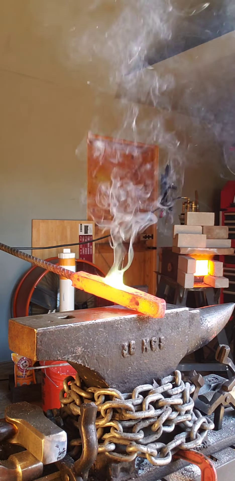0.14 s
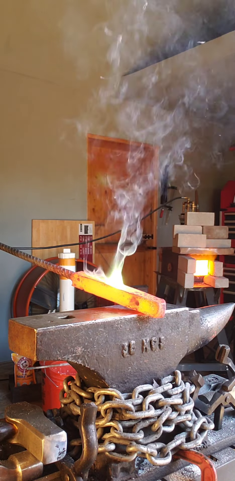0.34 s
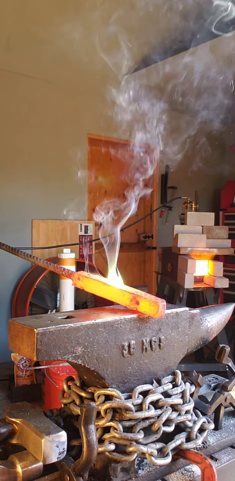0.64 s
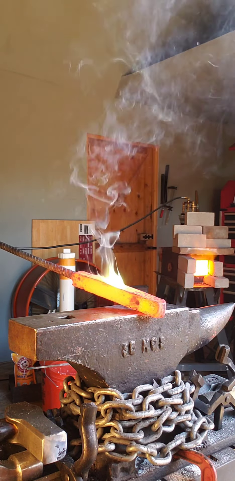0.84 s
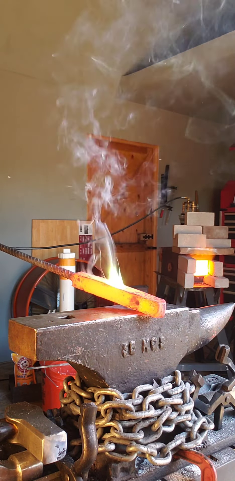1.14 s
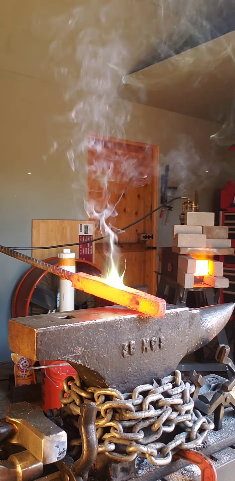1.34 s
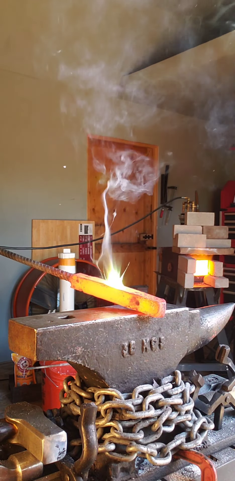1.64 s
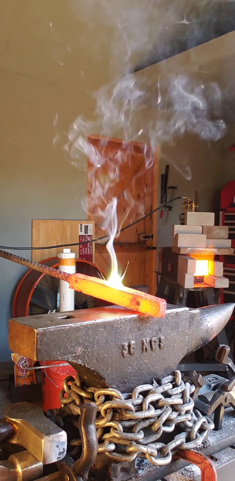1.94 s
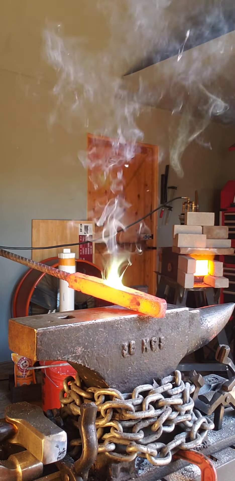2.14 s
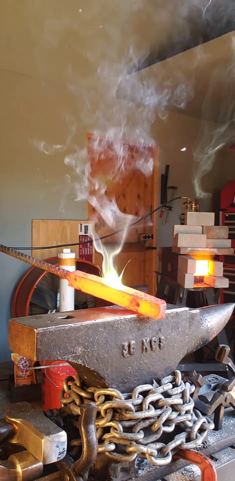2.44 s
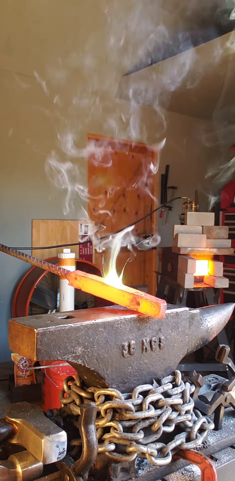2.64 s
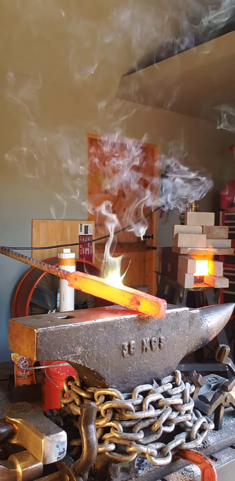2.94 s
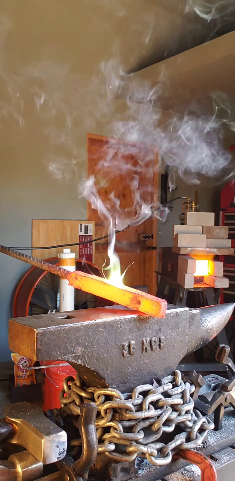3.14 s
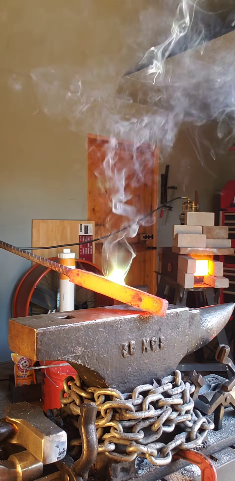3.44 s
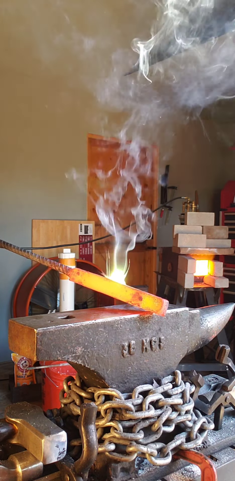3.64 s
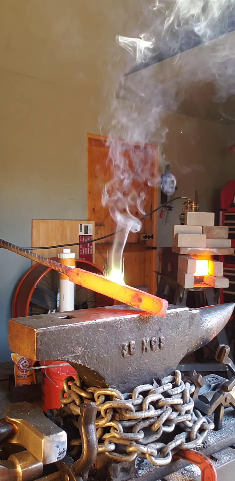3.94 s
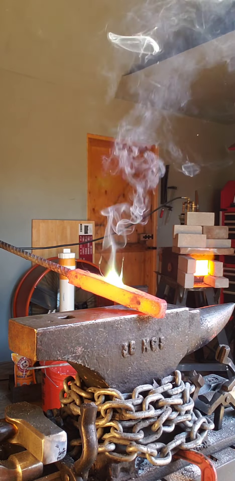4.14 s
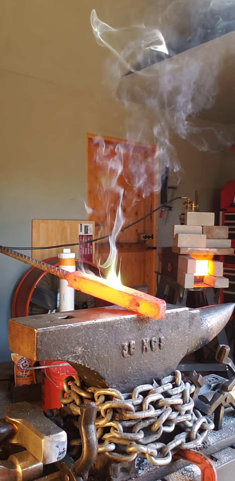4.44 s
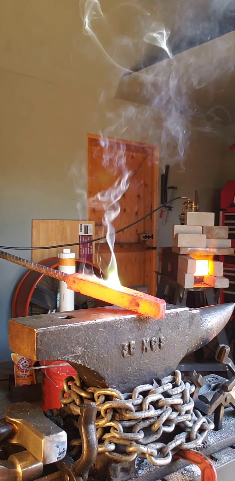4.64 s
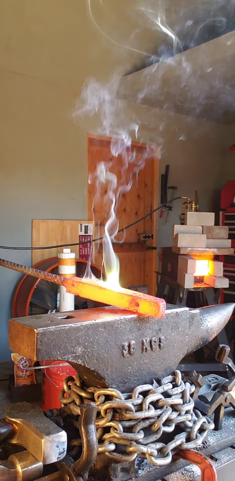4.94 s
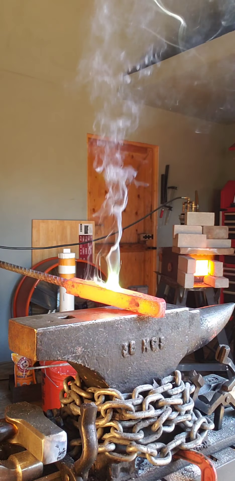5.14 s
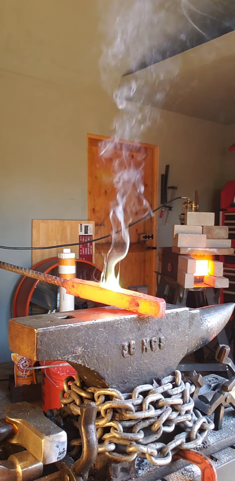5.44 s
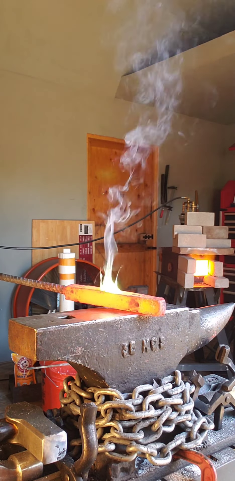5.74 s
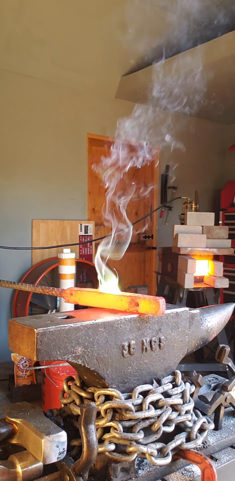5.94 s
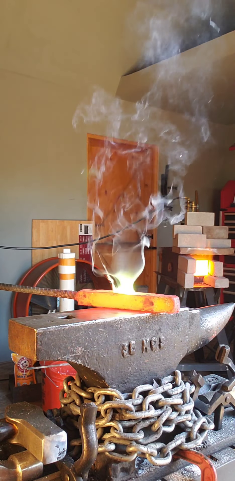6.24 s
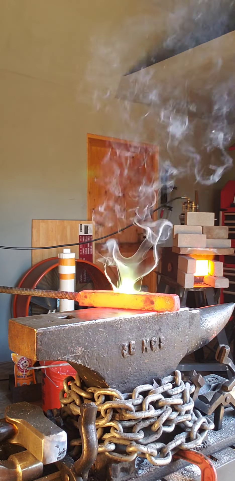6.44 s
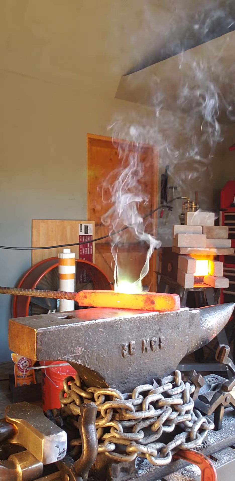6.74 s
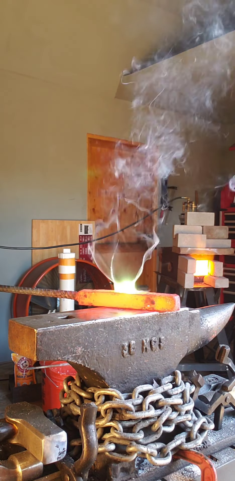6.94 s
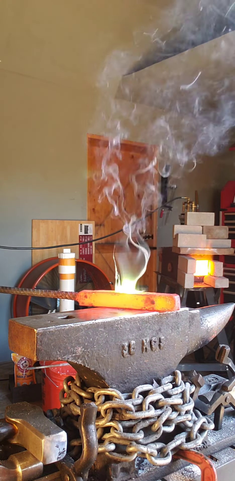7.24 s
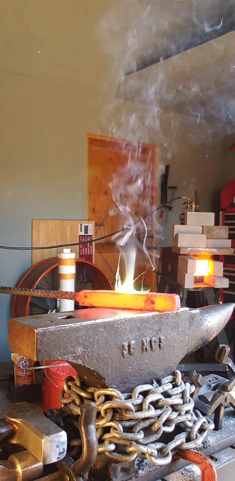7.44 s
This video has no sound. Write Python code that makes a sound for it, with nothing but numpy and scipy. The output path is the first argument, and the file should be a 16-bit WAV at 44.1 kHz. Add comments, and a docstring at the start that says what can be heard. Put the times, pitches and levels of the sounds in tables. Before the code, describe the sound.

Continuous rumbling burner roar from a small gas furnace, with wavering midrange drones, breathy whistle, soft hiss and a few faint scrapes.

```python
"""A lit gas forge roars for seven and a half seconds, heard by a camera's two microphones.
From the start, noise rings in the firebox and room, over a hissing gas jet, a breathy whistle and a low hum.
The low roar briefly dips and swells now and then, first at about a third of a second, last at about six seconds.
The forge gets a little louder before one second, and its drones keep swelling and dipping throughout.
Faint scrapes, made of short bursts of noise, come in pairs just after two seconds and after six and a half."""
import sys
import numpy as np
from scipy.fft import rfft, irfft, next_fast_len
from scipy.io import wavfile
from scipy.ndimage import uniform_filter1d, map_coordinates

SR = 44100
rng = np.random.default_rng(int(sys.argv[2]) if len(sys.argv) > 2 else 0)


def to_wav(sig):
    """Store sig (one row per channel, or 1-D mono) as 16-bit WAV at the path in sys.argv[1].

    Samples outside -1..1 are clipped; the rate is SR.
    """
    pcm = np.clip(np.atleast_2d(sig), -1, 1) * 32767
    pcm = np.round(pcm).astype(np.int16)
    wavfile.write(sys.argv[1], SR, pcm.T)  # frames by channels


N = 334485  # length in samples

# strong resonances, grouped by drone name: (pitch_hz, width_hz, rms level_db before swells and overall gain)
DRONES = {"low": [(167.3, 10.4, -33)], "hollow": [(275.2, 23.3, -34.5)], "main": [(350.7, 10.7, -27)],
          "twin": [(376.1, 9.9, -29), (386.7, 19, -33.5)], "upper": [(442.7, 13.3, -28)]}
# rough depth of each drone's random flutter between swells: depth_db by drone name
FLUTTER_DB = {"low": 2, "hollow": 1.7, "main": 1.8, "twin": 2, "upper": 1.3}
# swells and dips of the drones: (centre_s, drone name, level_db against its usual level, length_s)
SWELLS = [(0.046, "main", 6, 0.11), (0.428, "main", 7, 0.052), (0.813, "upper", 6.5, 0.067),
          (0.503, "upper", 9.5, 0.082), (0.563, "main", -6, 0.098), (0.633, "upper", -7, 0.11),
          (1.03, "main", 10, 0.055), (1.27, "main", -18, 0.13), (1.282, "upper", 6.5, 0.16),
          (1.34, "hollow", 6, 0.071), (1.37, "low", 7, 0.078), (1.474, "main", 4, 0.66),
          (1.52, "upper", 4, .08), (1.728, "upper", 10.5, 0.11), (1.787, "low", 6, 0.12),
          (1.84, "upper", -10, 0.11), (1.923, "main", 9, 0.053), (2.138, "main", -9, 0.089),
          (2.248, "hollow", 7.5, 0.14), (2.37, "upper", 11, 0.061), (2.565, "main", 8, 0.11),
          (2.764, "twin", 5.5, 0.11), (2.89, "hollow", 7.5, 0.35), (2.945, "upper", 3.5, 0.24),
          (2.97, "twin", 7.5, 0.12), (3.11, "main", 8.5, 0.069), (3.142, "low", 9.5, 0.076),
          (3.28, "main", -6, 0.16), (3.326, "twin", -3.5, 0.099), (3.325, "upper", -15, 0.064),
          (3.454, "main", -7, 0.11), (3.61, "main", 6, .09), (3.715, "main", -11, 0.14),
          (3.72, "twin", -7, .12), (3.84, "low", 7.5, 0.21), (3.903, "twin", 6, 0.14),
          (3.96, "main", 9, 0.12), (4.115, "low", 6, .12), (4.195, "main", -2.5, 0.28),
          (4.315, "upper", -14, 0.063), (4.563, "upper", 7, 0.11), (4.636, "twin", 3, .08),
          (4.685, "main", 6, 0.099), (4.82, "twin", 6.5, 0.058), (4.72, "low", -2, .14),
          (4.96, "hollow", 6.5, 0.12), (5.082, "main", 6.5, 0.091), (5.099, "low", 11, 0.091),
          (5.336, "low", -9, 0.2), (5.455, "twin", -12, 0.07), (5.49, "main", -7, 0.088),
          (5.53, "hollow", 6, 0.092), (5.667, "main", 9, 0.065), (5.793, "low", 6.5, 0.18),
          (5.827, "hollow", 9.5, 0.082), (5.926, "main", 7.5, 0.21), (6.114, "low", 8.5, 0.11),
          (6.455, "hollow", 6.5, 0.072), (6.59, "main", 7.5, 0.16), (6.634, "twin", 9, 0.17),
          (6.693, "hollow", 5.5, 0.083), (6.71, "low", -9, 0.094), (6.974, "upper", 9, 0.093),
          (7.312, "twin", 7, 0.09), (7.39, "main", 4, 0.13), (7.40, "upper", 5, 0.065),
          (7.527, "hollow", 6, 0.095)]
FLUTTER_RATE = 11  # random flutter points per second
WANDER_SHARE, WANDER_RATE = 0.00403, 9  # rough share of the pitch; random points per second
STEADY_S = 0.095  # a drone's natural random swings are evened out over this time


def drone(name):
    """The flame drives a strong resonance: its pitch wanders, and its level flutters, swells and dips."""
    t = np.arange(N) / SR
    ringing_noise = turbulence(lambda hz: ringing(DRONES[name], hz))
    voice = steadied(ringing_noise, seconds=STEADY_S)

    # reading the sound a little faster or slower bends its pitch
    warped_s = t + np.cumsum(WANDER_SHARE * wobble(WANDER_RATE)) / SR
    voice = np.array([np.interp(warped_s, t, side) for side in voice])

    level_db = FLUTTER_DB[name] * wobble(FLUTTER_RATE)
    for centre_s, which, swell_db, length_s in SWELLS:
        if which == name:
            # the level glides from its flutter to the swell's own level and back
            level_db = level_db + (swell_db - level_db) * bell(centre_s, length_s)
    return amp(level_db) * voice


# weaker resonances of firebox and room: (pitch_hz, width_hz, rms level_db before later gains)
RESONANCES = [(72, 6.8, -42.5), (95.2, 7.8, -41.5), (132.8, 27, -38), (185, 10, -38), (207, 14, -35.5),
              (230, 19.6, -35.5), (308.2, 4.8, -39), (413, 9.9, -39), (479.2, 19.7, -35.5),
              (502, 17, -41.5), (549, 16, -38), (590.6, 9.6, -39), (624, 16, -44), (647.5, 18, -46.5),
              (677, 17, -44.5), (710.5, 31, -44), (750, 13, -49), (786.4, 16, -46), (802, 13, -46.5),
              (815, 9, -45), (870, 15, -48), (918.3, 14, -43), (945.4, 12, -48), (995.4, 23, -45.5),
              (1050, 10, -52), (1090, 15, -50.5), (1147, 12, -48.5), (1200, 7.4, -58.5), (1300, 100, -45.5),
              (1680, 120, -54)]
# the broad roar between the resonances, before later gains: (pitch_hz, level_db per Hz)
FLAME = [(15, -88.5), (30, -80.5), (50, -68), (110, -80), (180, -68), (310, -65), (450, -54.5),
         (650, -61.5), (1060, -67), (1550, -69.5), (1850, -79.5), (2400, -85), (2700, -89), (4000, -110),
         (8000, -130)]
# gain of the deep rumble: (time_s, gain_db)
RUMBLE = [(.15, 1), (.62, -5), (1.1, -2.5), (1.75, 2), (2.3, -2), (4.5, 1.5), (5.15, 1.5), (5.6, -1.5),
          (7.58, -.5)]
RUMBLE_HZ = 130  # the deep rumble lies below this


def roar():
    """Burning gas: a fluttering broad roar with the weaker resonances in it, over a slowly heaving rumble."""
    resonant = turbulence(lambda hz: ringing(RESONANCES, hz))
    broad = turbulence(lambda hz: amp(along(FLAME, hz)) * room_ripple(hz, spacing_hz=7, depth_db=2))
    resonant_gain = amp(0.4 * wobble(22))
    broad_gain = amp(0.77 * wobble(30) - 0.92)
    burning = resonant_gain * resonant + broad_gain * broad
    deep = filtered(burning, lambda hz: below(RUMBLE_HZ, hz))
    return burning - deep + amp(curve(RUMBLE)) * deep


# short dips of the low roar, each followed by a brief swell: (turn_s, dip_db, swell_db)
ROAR_DIPS = [(0.345, -4, 1.5), (0.58, -2.5, 2), (1.883, -3.5, 1.5), (2.19, -5, 1), (2.525, -4, 3),
             (2.732, -3.5, 3), (4.437, -4, 4.5), (4.625, -4, 4), (4.806, -4, 3.5), (6.182, -3, 2)]
DIP_S, SWELL_S = 0.029, 0.029  # length of each bell-shaped dip and swell
LOW_ROAR_HZ = 600  # the dips and swells act on the drones and roar below this


def dip_and_swell():
    """Gain of the low roar: a short dip just before each turn and a brief swell just after."""
    gain_db = np.zeros(N)
    for turn_s, dip_db, swell_db in ROAR_DIPS:
        gain_db += dip_db * bell(turn_s - DIP_S / 2, DIP_S)
        gain_db += swell_db * bell(turn_s + SWELL_S / 2, SWELL_S)
    return amp(gain_db)


# the gas jet's hiss, before later gains: (pitch_hz, level_db per Hz)
JET = [(1500, -110), (2800, -87.5), (3500, -89.5), (4500, -89.5), (5450, -91), (5850, -97.5), (6400, -99),
       (7100, -96.5), (7700, -100), (8850, -101), (9300, -93.5), (10300, -92.5), (11100, -88.5),
       (11900, -89.5), (12550, -95.5), (13600, -88), (14700, -95), (15600, -89.5)]
AIR_HZ = 8000  # where the jet's low hiss gives way to its airy top


def jet():
    """Gas hisses through the burner's nozzle; the low hiss and the airy top flutter separately."""
    hiss = turbulence(lambda hz: amp(along(JET, hz)) * room_ripple(hz, spacing_hz=12, depth_db=1.9))
    low = filtered(hiss, lambda hz: below(AIR_HZ, hz))
    airy = hiss - low
    low_gain = amp(0.6 * wobble(18) - 0.75)
    airy_gain = amp(0.45 * wobble(26) - 0.34)
    return low_gain * low + airy_gain * airy


# level of the whistle before flicker and overall gain: (time_s, rms level_db)
WHISTLE = [(0, -56), (1.4, -52.5), (2.9, -53), (4.05, -54), (4.22, -48), (4.45, -53), (4.72, -51.5),
           (4.85, -53), (6.9, -54), (7.58, -51.5)]
WHISTLE_HZ, WHISTLE_WIDTH_HZ = 2196, 136  # a breathy resonance of the burner tube
FLICKER_DB, FLICKER_RATE = 1.1, 22  # rough depth of its random flicker; random points per second


def whistle():
    """The gas stream sounds the burner tube: noise ringing around one pitch, with a flickering level."""
    tube = turbulence(lambda hz: ringing([(WHISTLE_HZ, WHISTLE_WIDTH_HZ, 0)], hz))
    return amp(curve(WHISTLE) + FLICKER_DB * wobble(FLICKER_RATE)) * tube


# low hum: (pitch_hz, rms level_db before wobble and overall gain)
HUM = [(38, -61.5), (58.3, -44.5), (120, -44)]


def hum():
    """Low tones, unsteady in level and phase, pass through the response of both microphones."""
    t = np.arange(N) / SR
    tones = np.zeros(N)
    for pitch_hz, level_db in HUM:
        gain = amp(level_db + 2.1 * wobble(5))
        tones += gain * np.sin(2 * np.pi * pitch_hz * t + 0.26 * wobble(3.4))
    return filtered(np.sqrt(2) * tones, microphones)  # root 2 turns rms into peak


# faint scrapes: (start_s, level_db before the quick rise and fade, fading_s)
SCRAPES = [(2.08, -51, .025), (2.225, -52, .022), (6.601, -47.5, .034), (6.662, -57, .045)]
# relative colour of the scrapes: (pitch_hz, level_db)
SCRAPE_COLOUR = [(1500, -20), (2700, 4), (5700, 2), (6700, -12), (12000, -30)]
GRIT_DB = 1  # rough unevenness of the scrape


def scrape():
    """Short, gritty rasps of coloured noise that rise quickly and fade."""
    t = np.arange(N) / SR
    rasp = filtered(rng.standard_normal((2, N)), lambda hz: amp(along(SCRAPE_COLOUR, hz)))
    strokes = np.zeros(N)
    for start_s, level_db, fading_s in SCRAPES:
        age_s = np.maximum(t - start_s, 0)
        strokes += amp(level_db) * (1 - np.exp(-age_s / .002)) * np.exp(-age_s / fading_s)
    grit = amp(GRIT_DB * wobble(300))
    return strokes * grit * rasp / rasp.std()


# middle and length of the rise in seconds, then the gain before and after it in dB
RISE_AT_S, RISE_S, BEFORE_DB, HELD_DB = 0.73, 0.37, -2, 0.71


def strength():
    """Gain of the whole forge: a little lower at first, one smooth rise, then steady."""
    progress = np.clip((np.arange(N) / SR - RISE_AT_S) / RISE_S + .5, 0, 1)
    smooth = np.sin(np.pi / 2 * progress) ** 2
    return amp(BEFORE_DB + (HELD_DB - BEFORE_DB) * smooth)


# likeness of the two microphones: (pitch_hz, coherence from 0 to 1)
ALIKE = [(100, .98), (200, 0.99), (240, 0.89), (350, .97), (600, 0.86), (700, 0.77), (950, 0.72),
         (1050, 0.4), (1190, 0.63), (1270, 0.8), (1480, 0.89), (1670, 0.84), (1760, .22), (1900, 0.8),
         (2190, 0.83), (2350, 0.5), (2530, 0.5), (2850, 0.4), (3400, 0.25), (12000, 0)]


def turbulence(colour):
    """Noise of the given amplitude per root Hz, as it reaches the two microphones."""
    size = next_fast_len(N + 8192)
    hz = np.fft.rfftfreq(size, 1 / SR)
    white = rfft(rng.standard_normal((2, size))) * np.sqrt(SR / 2)
    # share the power between what both sides hear alike and what sets them apart
    turn = np.arccos(np.clip(along(ALIKE, hz), -1, 1)) / 2
    shares = np.array([np.cos(turn), np.sin(turn)])
    common, apart = white * colour(hz) * shares
    sides = np.array([common + apart, common - apart])
    return irfft(sides * microphones(hz), size)[:, :N]


# left against right microphone: (pitch_hz, left minus right in dB)
BALANCE = [(60, 1), (170, 1.7), (300, 3), (590, 3.5), (670, -3), (750, -1), (870, -6), (1020, -4.5),
           (1270, 1), (1520, 0), (1790, -7), (1910, 0.5), (2180, 1.5), (2420, -5), (3000, 1), (4400, -6),
           (5400, -4), (6500, -1.5), (8400, 3.5), (9500, -1), (11400, -7), (13000, 0), (14200, 2),
           (15500, 5)]
# the left microphone's lead over the right: (pitch_hz, phase in radians)
LEAD = [(850, 0), (980, 0.5), (1060, 1.5), (1290, 3), (1700, 3), (1810, 0.2), (2200, 0), (2480, -1.5),
        (2600, -3.5), (3200, -2.5), (3700, -7.5), (4400, -9)]


def microphones(hz):
    """Gain and phase of the left and right microphone, at equal total power."""
    tilt = amp(along(BALANCE, hz) / 2) * np.exp(1j * along(LEAD, hz) / 2)
    pair = np.array([tilt, 1 / tilt])
    return pair / np.sqrt(np.mean(np.abs(pair) ** 2, axis=0))


def ringing(modes, hz):
    """Amplitude per root Hz of steep-sided resonances, added in power."""
    power = 0
    for centre_hz, width_hz, level_db in modes:
        offset = np.pi / 2 * (hz - centre_hz) / width_hz
        power = power + amp(level_db) ** 2 / width_hz / (1 + offset ** 2) ** 2
    return np.sqrt(power)


def room_ripple(hz, spacing_hz, depth_db):
    """Crowded reflections leave fine random peaks and dips in a spectrum."""
    knots = rng.standard_normal(size=8192)
    return amp(depth_db * map_coordinates(knots, [hz / spacing_hz], mode="wrap"))


def steadied(x, seconds):
    """x with its slow random swells evened out, at about the same rms."""
    power = np.mean(x ** 2, axis=0)
    span = max(int(seconds * SR), 1)
    local = np.abs(uniform_filter1d(uniform_filter1d(power, span), span))
    return x * np.sqrt(power.mean() / (local + 1e-12))


def filtered(x, response):
    """x with each frequency multiplied by the response there."""
    size = next_fast_len(N + SR // 2)
    return irfft(rfft(x, size) * response(np.fft.rfftfreq(size, 1 / SR)), size)[..., :N]


def below(edge_hz, hz):
    """Response that keeps what lies below the edge and falls off steeply above it."""
    return 1 / (1 + (hz / edge_hz) ** 8)


def amp(db):
    """Decibels to gain."""
    return 10 ** (np.asarray(db) / 20)


def along(points, hz):
    """(pitch_hz, value) points joined by lines on a log pitch axis."""
    f, v = np.transpose(points)
    return np.interp(np.log(hz + 1), np.log(f), v)


def curve(points):
    """(time_s, value) points joined by lines, one value per sample."""
    return np.interp(np.arange(N) / SR, *np.transpose(points))


def wobble(rate):
    """A smooth random curve through the given number of random points a second."""
    knots = rng.standard_normal(int(N * rate / SR) + 4)
    return map_coordinates(knots, [np.arange(N) * rate / SR])


def bell(centre_s, length_s):
    """A smooth bump of height 1."""
    return np.exp(-(2 * (np.arange(N) / SR - centre_s) / length_s) ** 2)


def scene():
    """The forge, rising once to its full strength, with the faint scrapes beside it."""
    flame = sum(drone(name) for name in DRONES) + roar()
    low_roar = filtered(flame, lambda hz: below(LOW_ROAR_HZ, hz))
    flame = flame - low_roar + dip_and_swell() * low_roar
    forge = flame + whistle() + jet() + hum()
    return strength() * forge + scrape()


TOP_HZ = 15780  # the camera's band limit
FADE_S = .004  # fade at each end


def record(dry):
    """The sound starts and stops without a click; the camera keeps nothing above its band limit."""
    t = np.arange(N) / SR
    to_nearest_end_s = np.minimum(t, t[-1] - t)
    ends = np.sin(np.pi / 2 * np.minimum(to_nearest_end_s / FADE_S, 1)) ** 2
    return filtered(dry * ends, lambda hz: hz < TOP_HZ)


dry = scene()
out = record(dry)
to_wav(out)
```